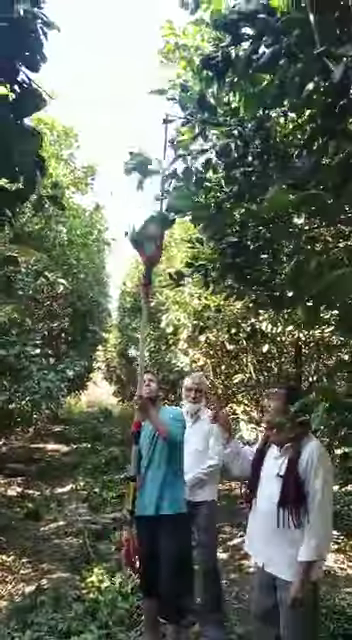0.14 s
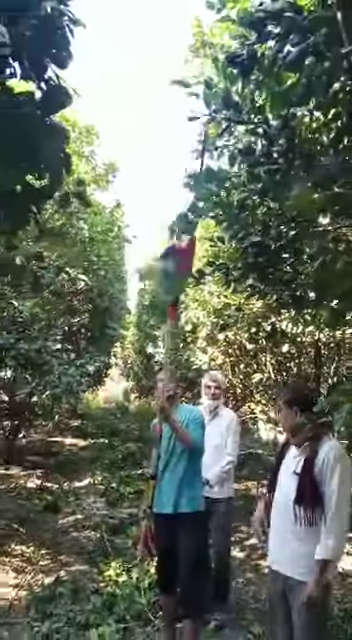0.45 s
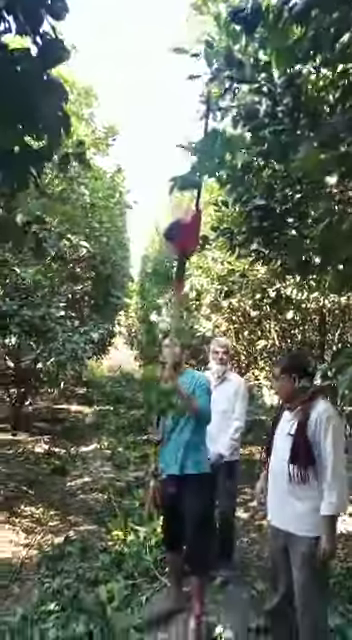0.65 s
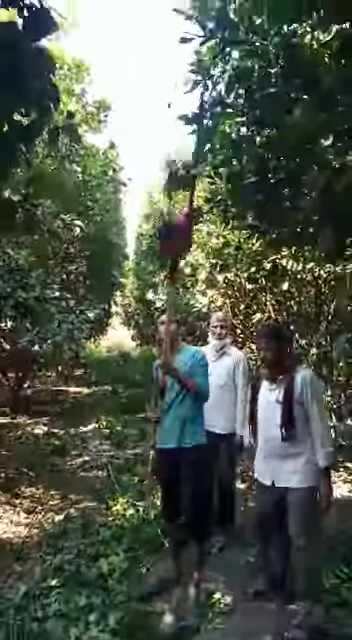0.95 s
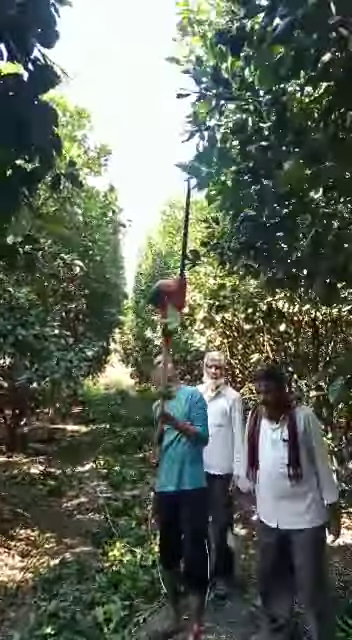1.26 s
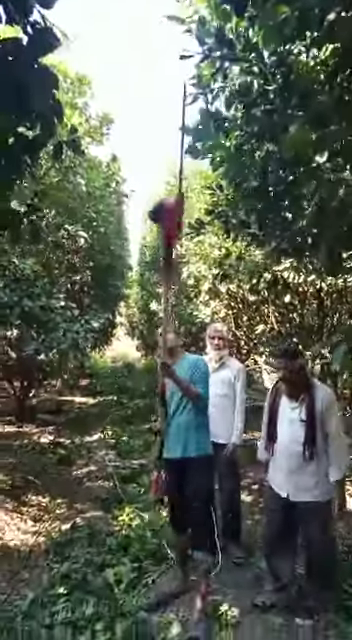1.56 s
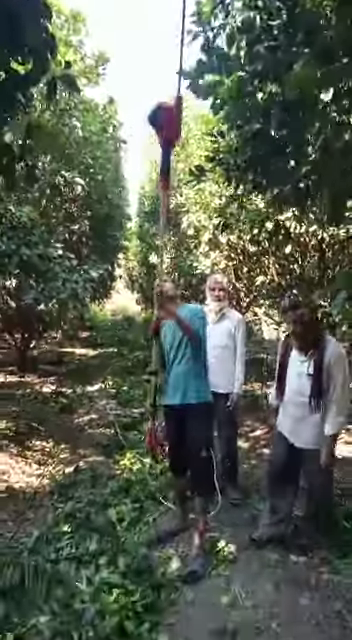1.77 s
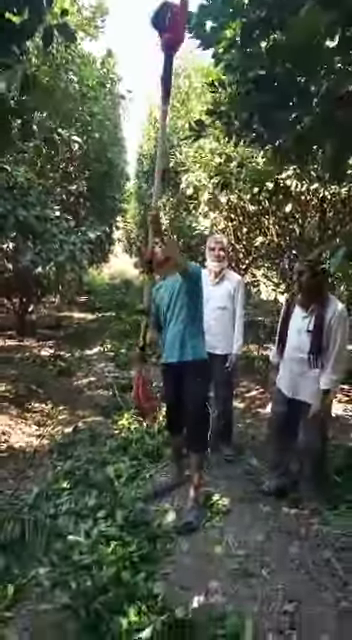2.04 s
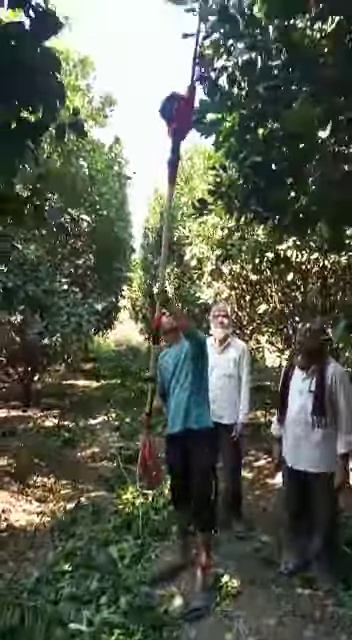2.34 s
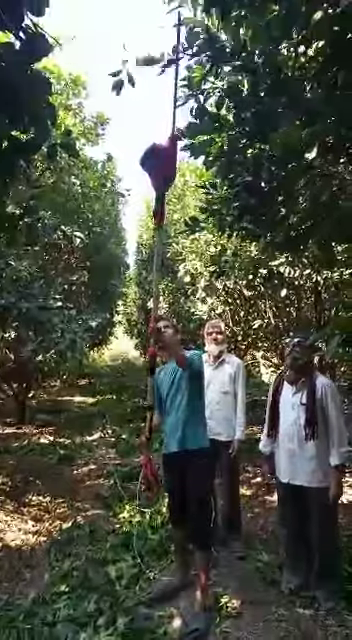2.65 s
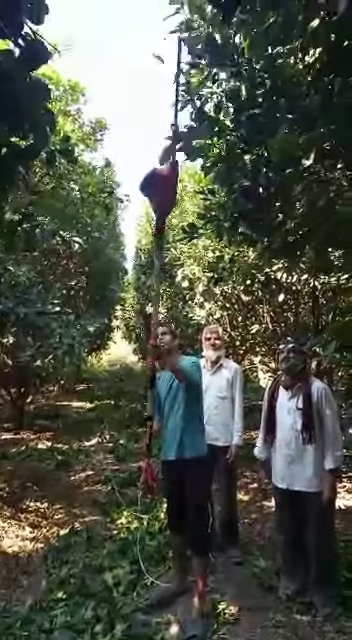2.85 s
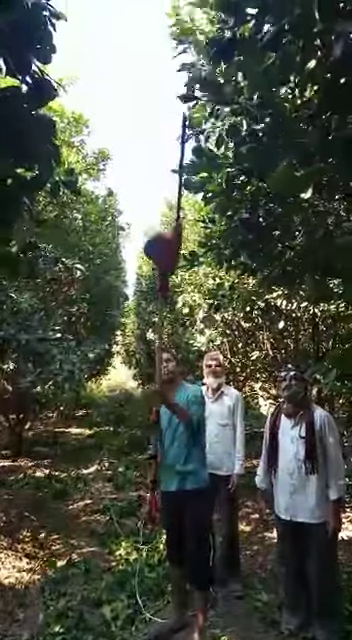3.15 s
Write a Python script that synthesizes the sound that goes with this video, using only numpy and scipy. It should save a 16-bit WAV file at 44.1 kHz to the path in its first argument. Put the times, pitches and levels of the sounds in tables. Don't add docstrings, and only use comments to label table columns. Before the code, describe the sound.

Loud metallic buzzing rattle of an electric pole trimmer running without pause, with a few twig snaps.

```python
import sys
import numpy as np
from scipy import signal
from scipy.fft import rfft, irfft
from scipy.io import wavfile
from scipy.ndimage import uniform_filter1d

SR = 44100
rng = np.random.default_rng(int(sys.argv[2]) if len(sys.argv) > 2 else 0)


def persist_wave(psi):
    counts = np.round(np.clip(psi, -1, 1) * 32767).astype(np.int16)
    wavfile.write(sys.argv[1], SR, np.atleast_2d(counts).T)


def boost(x):
    u = np.asarray(x, float) / 20
    return 10 ** u


N = 145530
GEAR_RATIO = 14.75


def in_time(rows):
    s, *columns = np.transpose(rows)
    return [np.interp(np.arange(N) / SR, s, c) for c in columns]


def rms_one(x):
    return x / np.sqrt(np.mean(x ** 2) + 1e-20)


def drift(rate_hz):
    r = np.exp(-80 * np.pi * rate_hz / SR)
    noise = rng.standard_normal(N // 40 + 2002)
    slow = signal.lfilter([1], [1, -2 * r, r * r], noise)[2000:]
    return np.interp(np.arange(N) / 40, np.arange(len(slow)), rms_one(slow - slow.mean()))


def breeze():
    band = signal.butter(3, [18, 65], "band", fs=SR, output="sos")
    low = signal.sosfilt(band, rng.standard_normal(N))
    return boost(-82.5 + 5.3 * drift(4.7)) * rms_one(low)


# start in seconds, crack level in dB, thud level in dB.
SNAPS = [
    (0.621, -30, -72),
    (.9, -30, -72),
    (2.94, -20, -47),
]


def twigs():
    length = 4410
    out, t = np.zeros(N + length), np.arange(length) / SR
    band = signal.butter(1, [1125, 13500], "band", fs=SR, output="sos")
    for start_s, crack_db, thud_db in SNAPS:
        crack = signal.sosfilt(band, rng.standard_normal(length)) * boost(-60 * t / 0.035)
        thud = np.sin(2 * np.pi * 150 * t) * boost(-60 * t / 0.027)
        start = int(start_s * SR)
        out[start:start + length] += boost(crack_db) * crack + boost(thud_db) * thud
    return out[:N]


# multiple of the shaft rate, level in dB against the hum.
OVERTONES = [(2, -7), (3, -6), (4, -6), (5, -10), (12, -2)]


def motor(turns, whine_db, hum_db):
    hum = np.sin(2 * np.pi * turns) * boost(drift(7))
    for multiple, db in OVERTONES:
        wobble = 0.1 * drift(9.3)
        hum = hum + boost(db + 2.1 * drift(2.8)) * np.sin(2 * np.pi * (multiple * turns + wobble))
    tone = np.sin(2 * np.pi * 21 * turns + 0.5 * drift(45))
    crank_swing_db = 1.2 * np.cos(4 * np.pi * turns / GEAR_RATIO - 1.5)
    flicker_db = 2 * drift(29) + 2.0 * drift(26)
    whine = boost(whine_db + flicker_db + crank_swing_db) * tone
    return np.sqrt(2) * (boost(hum_db) * hum + whine)


def knocks():
    hits = rng.uniform(0.9, 1, N) * (rng.random(N) < 50 / SR)
    fade = np.exp(-1 / (0.008 * SR))
    jumps = np.tanh(signal.lfilter([1], [1, -fade], hits + 1e-18))
    return rms_one(jumps - uniform_filter1d(jumps, SR // 8))


# swings per turn, size of the swing in dB, phase in radians.
STROKE = [(1, .8, 1.85), (2, 1.15, -1.5), (.3215, .4, 1.77), (.6395, .4, -1.5)]


def sliding(turns):
    crank = turns / GEAR_RATIO
    swing_db = sum(db * np.cos(2 * np.pi * k * crank + phase) for k, db, phase in STROKE)
    shudder_db = 0.75 * drift(38)
    effort_db = 1.04 * swing_db + shudder_db + 0.75 * knocks()
    ticks_per_s, tick_share = 9000, 0.3
    sizes = boost(2.0 * np.minimum(rng.exponential(1, N), 3.5)) * rng.choice([-1, 1], N)
    ticks = rms_one(sizes * (rng.random(N) < ticks_per_s / SR))
    scrape = rng.standard_normal(N)
    return boost(effort_db) * (np.sqrt(tick_share) * ticks + np.sqrt(1 - tick_share) * scrape)


# pitch in Hz, width in Hz, lift in dB.
RINGS = [(395, 40, 5), (470, 40, -6), (635, 50, -5), (700, 110, 4), (890, 110, 4), (1080, 60, -5),
         (1400, 120, 3), (1530, 60, 2), (4880, 220, -3), (5120, 200, 2), (6220, 130, 3), (6640, 120, 3),
         (10000, 260, 1), (11300, 300, 2)]


def coloured(x, spectrum, skirt_db=18):
    hz = np.fft.rfftfreq(N, 1 / SR) + 1
    at, db = np.transpose(spectrum)
    outside = np.maximum(at[0] / hz, np.maximum(hz / at[-1], 1))
    gain_db = np.interp(np.log(hz), np.log(at), db) - skirt_db * np.log2(outside)
    for ring_hz, width, lift_db in RINGS:
        gain_db = gain_db + lift_db / (1 + (2 * (hz - ring_hz) / width) ** 2)
    return rms_one(irfft(rfft(x) * boost(gain_db), N))


# middle in seconds, length in seconds, pitch in Hz, lift in dB.
BEAMS = [(.13, .2, 6220, 3), (.8, .4, 6220, 4), (1.6, .25, 6200, 4), (3.2, .25, 6250, 4),
         (.4, .5, 10050, 4), (1.35, .7, 10000, 5), (.8, .3, 9200, 3), (2.15, .5, 8600, 5),
         (2.3, 1.2, 9550, -4), (1.9, .6, 8100, 2), (2.6, .4, 8200, 3), (3.12, .45, 8050, 6),
         (3.1, .4, 8800, 5), (3.1, .4, 10450, 4), (2.65, .4, 6650, 4), (1.25, .5, 8000, -4),
         (.35, .2, 6650, 3), (2.2, .7, 900, 6), (2.1, .45, 1000, 5), (.62, .12, 230, 7), (2.4, .5, 1420, 3),
         (1.2, .5, 1330, 3), (.2, .2, 890, 4), (2.9, .5, 720, 3)]


def patchy(x):
    hz, s, z = signal.stft(x, SR, nperseg=1024, noverlap=768)
    patch_bins, patch_frames = int(250 / hz[1]) + 1, int(0.41 / s[1] / 2) + 1
    field = rng.standard_normal(z.shape)
    for _ in range(2):
        field = uniform_filter1d(field, patch_bins, axis=0)
        field = uniform_filter1d(field, patch_frames, axis=1)
    lumps = drift(6.6)[np.minimum(s * SR, N - 1).astype(int)]
    lows = 1 / (1 + (hz / 267) ** 4)
    fine = uniform_filter1d(rng.standard_normal(z.shape), int(0.22 / s[1]), axis=1)
    gain_db = 1.32 * rms_one(field) + 6 * np.outer(lows, lumps) + 1.7 * rms_one(fine)
    for middle, length, beam_hz, lift_db in BEAMS:
        width = 0.022 * beam_hz + 70
        in_pitch = np.exp(-(2 * (hz - beam_hz) / width) ** 2)
        in_passing = np.exp(-(2 * (s - middle) / length) ** 4)
        gain_db += lift_db * np.outer(in_pitch, in_passing)
    return signal.istft(z * boost(gain_db), SR, nperseg=1024, noverlap=768)[1][:N]


# pitch in Hz, level in dB.
BLADE_EDGE_ON = [(1180, -34), (2000, -26), (3080, -5.5), (4850, -6.5), (6070, 1), (6900, -1), (7780, -6.5),
                 (10200, -8), (13500, -26.5)]
BLADE_TURNED = [(1180, -80), (2000, -28.5), (2440, -11.5), (3310, -13.5), (4380, -11), (7300, 1),
                (8840, -8.5), (9730, -23.5), (13500, -28)]
HOUSING = [(125, -36), (200, -17), (300, -10.5), (470, -7), (700, -4.5), (1400, -3), (2000, -4.5),
           (2600, -12.5)]
PORT = [(13900, -9), (14050, -11), (14500, -9), (15000, 7.5), (15700, 0), (16500, 2.5)]


def blades(turns, turned):
    drive = sliding(turns)
    turned = np.clip(turned, 0, 1)
    steel = (1 - turned) * coloured(drive, BLADE_EDGE_ON) + turned * coloured(drive, BLADE_TURNED)
    housing = boost(-20) * coloured(drive, HOUSING, skirt_db=35)
    port = boost(-9) * coloured(drive, PORT, skirt_db=200)
    return patchy(steel + housing + port)


# time in seconds, turns per second, fan whine in dB.
SHAFT = [(0.0, 341.8, -34.0), (0.3, 341.4, -39.0), (0.57, 341.6, -36.0), (0.62, 330.4, -36.0),
         (0.68, 326.3, -33.0), (0.8, 332.6, -28.0), (0.92, 336.5, -32.0), (1.15, 334.2, -35.0),
         (1.4, 339.5, -35.0), (1.7, 342.7, -33.0), (2.1, 345.2, -34.0), (2.45, 347.6, -31.0),
         (2.55, 344.4, -30.0), (2.67, 335.2, -27.0), (2.9, 340.8, -30.0), (2.96, 331.3, -32.0),
         (3.1, 334.0, -32.0), (3.3, 339.4, -39.0)]
# time in seconds, rattle level in dB, share of the blade face turned
# to us from 0 to 1, lift of the whine in dB, hum level in dB.
HEAD = [(0, -21.5, 0.45, -1, -47), (.15, -21.5, 0.34, 7.5, -51.5), (.3, -23, 0.26, 2.5, -54),
        (.45, -22.5, 0.22, 4, -50), (.65, -21.5, 0.45, -9, -61), (.8, -23.5, 0.13, 5, -58),
        (1.0, -21.5, 0.39, -9, -58), (1.3, -23, 0.17, 0, -55.5), (1.52, -22.5, 0.16, -4, -53.5),
        (1.75, -21, 0.64, 4, -52.5), (2.0, -21, 0.65, 5.5, -56), (2.15, -21, 0.6, -5, -53),
        (2.4, -21, 0.71, -0.5, -50.5), (2.68, -21, 0.58, 1, -51.5), (2.85, -21.5, 0.62, -6, -52),
        (3.0, -21, 0.56, -6, -55.5), (3.15, -22.5, 0.37, 7, -53), (3.3, -22.5, 0.14, 3, -57)]


def scene():
    turns_per_s, whine_db = in_time(SHAFT)
    rattle_db, turned, lift_db, hum_db = in_time(HEAD)
    turns = np.cumsum(turns_per_s) / SR
    mono = breeze() + twigs()
    mono = mono + motor(turns, whine_db + lift_db, hum_db)
    mono = mono + boost(rattle_db) * blades(turns, turned)
    return np.array([mono, mono])


def low_pass(x):
    return signal.sosfilt(signal.butter(12, 17110, fs=SR, output="sos"), x)


def record(dry):
    hz = np.fft.rfftfreq(N, 1 / SR)
    headroom = 0.6
    rounding = rfft(headroom * np.tanh(dry / headroom) - dry)
    rounding = rounding / (1 + (250 / (hz + 1)) ** 6)
    top_cut_db = -0.55 * np.maximum(hz - 15745, 0)
    mix = irfft((rfft(dry) + rounding) * boost(top_cut_db), N)
    return low_pass(mix)


dry = scene()
out = record(dry)
persist_wave(out)
```